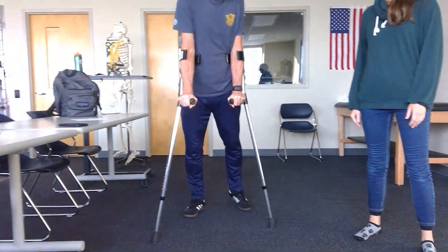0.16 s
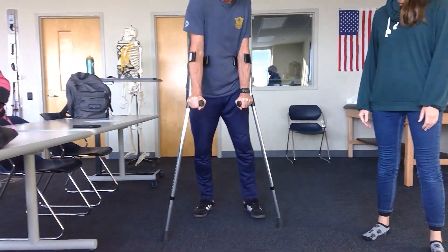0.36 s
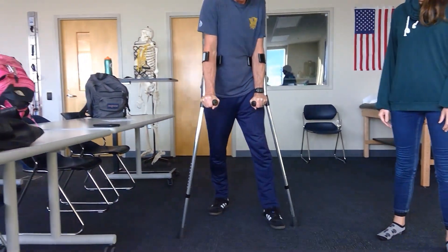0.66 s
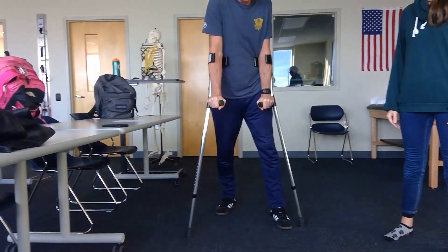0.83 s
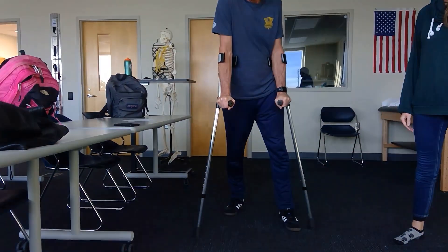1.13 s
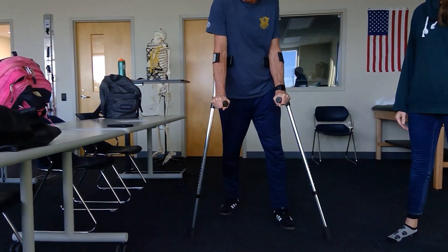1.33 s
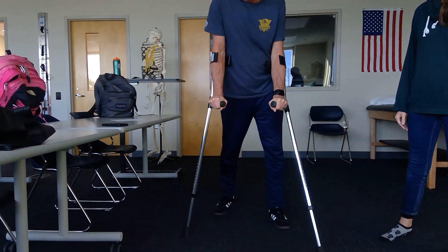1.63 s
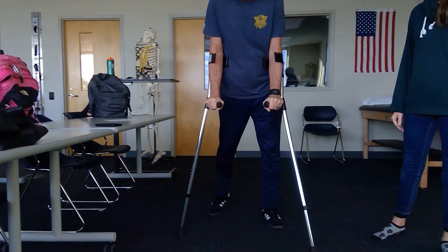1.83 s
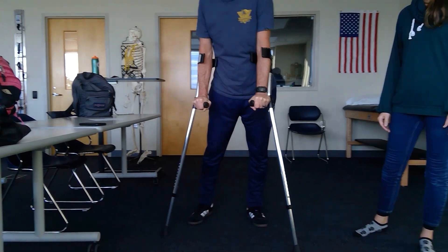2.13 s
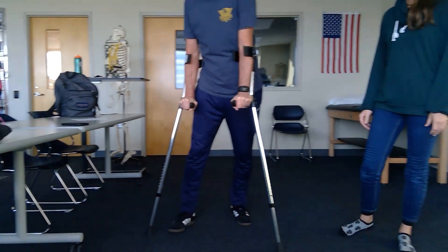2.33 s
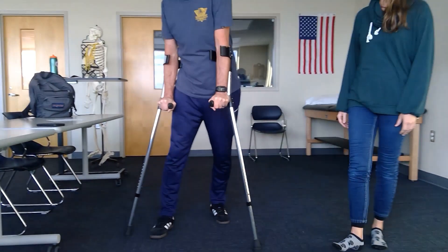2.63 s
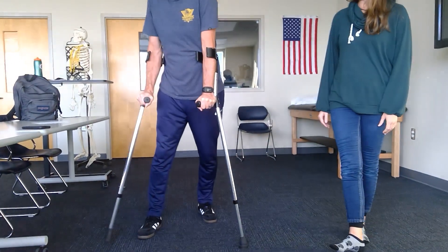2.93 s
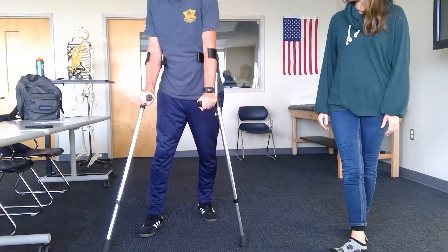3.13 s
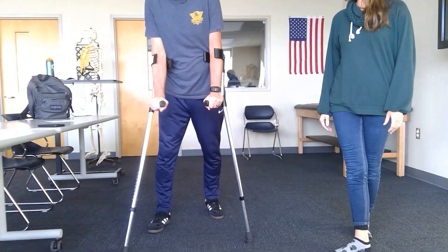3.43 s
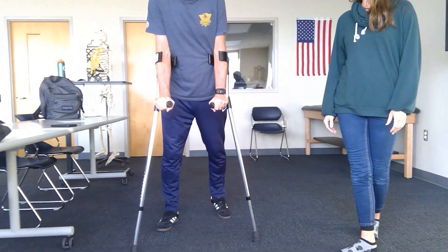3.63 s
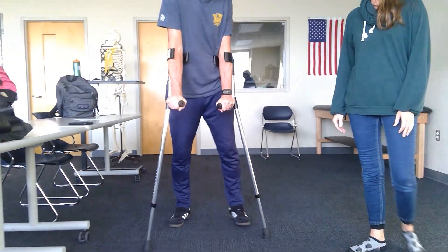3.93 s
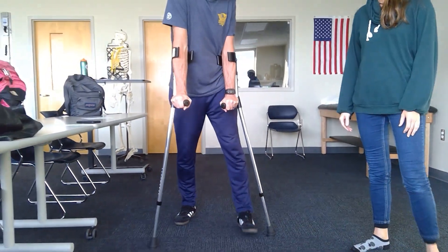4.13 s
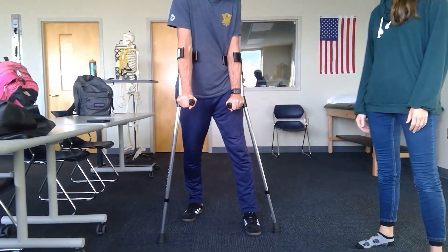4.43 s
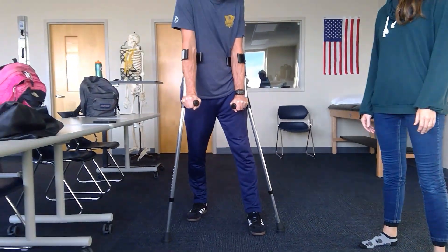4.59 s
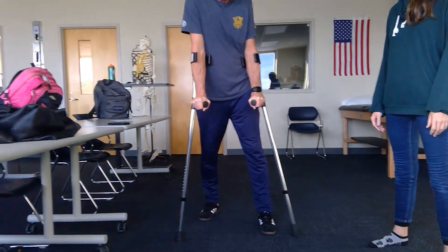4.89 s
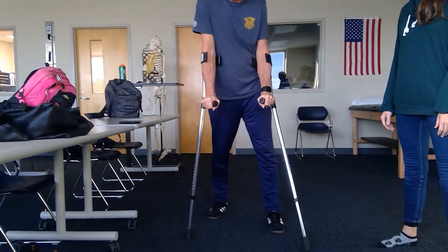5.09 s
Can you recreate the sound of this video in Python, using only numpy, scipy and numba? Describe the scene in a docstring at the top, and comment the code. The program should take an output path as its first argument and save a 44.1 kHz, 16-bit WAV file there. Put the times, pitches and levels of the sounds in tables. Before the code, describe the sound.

Aluminium crutches on carpet, heard from a few metres in stereo, leaning right, with short room reflections over steady air rumble and a very faint high whine. Quiet joint ticks, a faint rubber groan and dull foot pats lead to a muted knock; soles brush, sharp pin clicks precede one hard metallic clack, then a squeak, light scuffs and sparse ticks.

```python
"""Someone walks on two aluminium forearm crutches over carpet, a few metres from a stereo microphone in a small room.
Over ventilation rumble and a thin whine, a joint ticks, rubber groans faintly, a height pin clicks and a shoe pats.
A gentle tip plant knocks the tubes; soles brush the carpet and two more pin clicks lead to a second, hard plant.
A rising rubber squeak, more brushing and faint ticks follow. Shaped noise makes the contacts and carpet sounds,
decaying sines the ringing metal, gliding sines the rubber; decaying noise makes the room's reflections."""
import sys
import numpy as np
from scipy import signal
from scipy.fft import rfft, irfft, next_fast_len
from scipy.io import wavfile
from scipy.ndimage import uniform_filter1d
from numba import njit

SR = 44100
rng = np.random.default_rng(int(sys.argv[2]) if len(sys.argv) > 2 else 0)


def unload_wav(signal):
    """Save mono or channel-first audio to the path in sys.argv[1] as 16-bit WAV at rate SR, clipped to [-1, 1]."""
    wavfile.write(
        sys.argv[1],
        SR,
        np.round(np.clip(np.atleast_2d(signal).T, -1, 1) * 32767).astype(np.int16),
    )


N = 231611
TIME = np.arange(N) / SR
RING = TIME[:SR]  # one second, the span of every short sound


def undb(db):
    """Decibels to gain."""
    return 10 ** (np.asarray(db) / 20)


def level(x, db):
    """Set the rms level."""
    return x * undb(db) / np.sqrt(np.mean(x ** 2))


def burst(x, db=0):
    """Give a short sound the energy of 10 ms at this rms level."""
    return x * undb(db) * np.sqrt(SR / 100 / np.sum(x ** 2))


def lookup(hz, points):
    """Read (Hz, value) points on a log-frequency axis."""
    point_hz, value = np.transpose(points)
    return np.interp(np.log(np.maximum(hz, 1)), np.log(point_hz), value)


def colour(x, points, tilt_db=0):
    """Causal minimum-phase filter with a (Hz, dB) response, tilted per octave."""
    size = 2 * next_fast_len(len(x))
    hz = np.maximum(np.arange(size // 2 + 1) * SR / size, 10)
    response_db = lookup(hz, points) + tilt_db * np.log2(hz / hz.mean())
    cepstrum = irfft(np.log(undb(response_db)))
    # fold onto positive time
    cepstrum[1:size // 2] *= 2
    cepstrum[size // 2 + 1:] = 0
    return irfft(rfft(x, size) * np.exp(rfft(cepstrum)))[:len(x)]


def decay(t60_s):
    """An exponential fall of 60 dB in t60_s."""
    return np.exp(-np.log(1000) * RING / t60_s)


def delay(x, s):
    """The same sound s seconds later."""
    return np.concatenate([np.zeros(int(abs(s) * SR)), x])[:len(x)]


def add(track, start_s, x):
    """Mix a sound into a track."""
    start = int(start_s * SR)
    track[..., start:start + x.shape[-1]] += x[..., :N - start]


def wander(size):
    """Smooth random motion of rms 1 that changes over about this many samples."""
    smooth = uniform_filter1d(rng.standard_normal(N), size)
    return level(uniform_filter1d(smooth, size), 0)


def envelope(start_s, length_s, attack_s, release_s):
    """Gain of a sliding contact: it builds up, holds and falls 60 dB in release_s."""
    rise = np.sin(np.pi / 2 * np.clip((TIME - start_s) / attack_s, 0, 1)) ** 2
    past_end_s = np.maximum(TIME - start_s - length_s, 0)
    return rise * np.exp(-np.log(1000) * past_end_s / release_s)


def ring(modes):
    """Freely decaying modes of a struck part, each starting at a random phase."""
    total = 0
    for hz, db, t60_s in modes:
        total = total + undb(db) * decay(t60_s) * np.sin(2 * np.pi * (hz * RING + rng.random()))
    return burst(total)


def chatter(t60_s):
    """A dying run of tiny contacts, with its energy spread evenly over frequency."""
    x = rng.standard_normal(len(RING)) * decay(t60_s)
    even = irfft(np.exp(1j * np.angle(rfft(x))), len(x))
    return burst(even * decay(10 * t60_s))


def crack(points, t60_s, snap_db=-8):
    """One sharp contact and the chatter of loose parts after it."""
    snap = burst(1. * (RING == 0), snap_db)
    return burst(colour(chatter(t60_s) + snap, points))


def diffuse(size):
    """Noise arriving from all sides: alike at both ports in the bass, unrelated in the treble."""
    # correlation of the two ports in a diffuse field: freq_hz, correlation [-]
    likeness = [(30, 0.55), (70, 1), (130, 0.96), (290, 0.88), (640, 0.62), (1400, 0.084), (3000, 0.079),
                (16000, 0)]
    mid, side = rfft(rng.standard_normal((2, size)))
    alike = np.clip(lookup(np.arange(len(mid)) * SR / size, likeness), -1, 1)
    mid = mid * np.sqrt((1 + alike) / 2)
    side = side * np.sqrt((1 - alike) / 2)
    return irfft(np.array([mid + side, mid - side]), size)


def with_room(x, room_db):
    """A sound as two rows: what goes straight to the microphone, and what it sends into the room."""
    return np.array([x, x * undb(room_db)])


def background(air_db=-59, flutter_db=1, whine_hz=11804, whine_db=-85.5):
    """Ventilation noise whose rumble wavers and slowly eases, with smooth hiss and a steady electronic whine."""
    # ventilation spectrum: freq_hz, gain_db
    air_colour = [(10, 5), (20, 5), (35, -9.5), (50, -10.5), (66, -8.5), (100, -15.5), (125, -17.5),
                  (155, -25.5), (210, -20), (500, -32.5), (1000, -38), (2000, -41), (8000, -45),
                  (16000, -48)]
    rumble_db, ease_db_per_s = 3.5, 0.08
    air = level(np.array([colour(port, air_colour) for port in diffuse(N)]), air_db)
    rumble = signal.sosfilt(signal.butter(1, 1000, fs=SR, output="sos"), air)
    knots_s = np.linspace(0, TIME[-1], num=40)
    flutter = np.interp(TIME, knots_s, rng.standard_normal(len(knots_s)))
    swell_db = rumble_db - ease_db_per_s * TIME + flutter_db * flutter
    whine = level(np.sin(2 * np.pi * whine_hz * TIME), whine_db)
    return air + rumble * (undb(swell_db) - 1) + whine


def room(x, build_s=0.014, left_db=-2.5):
    """Diffuse reflections that build up quickly and mostly die sooner in the treble."""
    # reverberation time: freq_hz, t60_s
    room_t60 = [(60, 1.0), (250, .6), (600, 0.37), (1500, 0.25), (3500, 0.29), (8000, 0.27), (15000, 0.24)]
    hz, s, cells = signal.stft(diffuse(len(RING)), SR, nperseg=256)
    t60_s = lookup(hz, room_t60)[:, None]
    tail = signal.istft(cells * np.exp(-np.log(1000) * s / t60_s), SR)[1][:, :len(RING)]
    tail = tail * (1 - decay(build_s))
    tail = tail / np.sqrt(np.sum(tail ** 2) / 2) * undb([[left_db], [0]])
    return signal.fftconvolve(x[None], tail, axes=1)[:, :N]


def direct(x, echo_s=0.0089, echo_db=-10, left_lag_s=.00007):
    """The straight path and one bounce off a near surface; both reach the left port later and duller."""
    # left port, facing away from the walker: freq_hz, gain_db
    shadow = [(100, -3), (500, -9), (1300, -14.5), (3500, -21.5), (15000, -11.5)]
    x = x + undb(echo_db) * delay(x, echo_s)
    return np.array([delay(colour(x, shadow), left_lag_s), x])


def steps():
    """A shoe settles on the carpet: soft, dull noise pats that swell and decay."""
    # pats: start_s, level_db, t60_s, tilt_db_per_octave
    step_events = [(0.426, -53, 0.14, -6.5), (0.699, -56, 0.074, -1), (0.814, -65, 0.039, 3),
                   (1.114, -59.5, 0.15, -5), (1.901, -67, 0.17, 6)]
    # pat spectrum: freq_hz, gain_db
    step_colour = [(100, -2.5), (250, 0), (390, 4.5), (560, -2.5), (750, 1), (1100, -11.5), (1550, 1.5),
                   (2100, -13), (2800, -23), (8000, -40)]
    out = np.zeros(N)
    for start_s, db, t60_s, tilt_db in step_events:
        pat = rng.standard_normal(len(RING)) * (decay(t60_s) - decay(t60_s / 4))
        add(out, start_s, burst(colour(pat, step_colour, tilt_db), db))
    return with_room(out, -3.0)


@njit
def resonate(x, hz, width_hz):
    """State-variable band-pass whose centre moves every sample."""
    y, band, low = np.empty(len(x)), 0., 0.
    for i in range(len(x)):
        g = np.tan(np.pi * hz[i] / SR)
        k = width_hz / hz[i]
        v = (band + g * (x[i] - low)) / (1 + g * (g + k))
        band = 2 * v - band
        low = low + 2 * g * v
        y[i] = k * v
    return y


def scuffs(fibres_per_s=4500, width_hz=340.0, broad_db=-4, narrow_db=-2):
    """Carpet loops flick off the sole as it grips and slips; the gap under the shoe resonates at a gliding pitch."""
    # brushes: start_s, length_s, gain_db, resonance_hz, glide_octaves_per_s
    scuff_events = [(2.212, 0.13, -64.5, 1310, 1.5), (2.372, 0.14, -52, 1260, 2.2),
                    (3.694, 0.13, -67, 602, -0.5), (4.181, 0.077, -67.5, 2190, -3.5),
                    (4.245, 0.033, -59, 1750, -4)]
    # brush spectrum: freq_hz, gain_db
    scuff_colour = [(90, -26.5), (170, 0), (300, -9), (600, -9), (950, -13.5), (1200, -9), (1650, -12),
                    (2200, -15), (2800, -20.5), (4600, -16), (7000, -29.5), (14000, -40)]
    attack_s, release_s = 0.049, 0.14
    out = np.zeros(N)
    for start_s, length_s, db, hz, glide in scuff_events:
        grip = undb(2.5 * wander(size=220))
        flicks = rng.standard_normal(N) * (rng.random(N) < fibres_per_s / SR) * grip
        brush = colour(flicks, scuff_colour)
        centre_hz = hz * 2 ** (glide * np.clip(TIME - start_s, 0, length_s))
        hollow = resonate(brush, centre_hz, width_hz)
        scuff = level(brush, broad_db) + level(hollow, narrow_db)
        out += scuff * undb(db) * envelope(start_s, length_s, attack_s, release_s)
    return with_room(out, -7.5)


def slips(room_db=-7):
    """Stick and slip: rubber groans or squeaks with a stuttering, rising tone; its first hard grip relaxes."""
    # slips: start_s, length_s, tone_level_db, start_pitch_hz, glide_hz_per_s, attack_s, bite_db,
    # pitch_jitter [fraction], stutter_db
    slip_events = [(0.221, 0.28, -74.5, 524, 15, 0.034, 14, 0.031, -0.2),
                   (3.685, 0.053, -66, 520, 7700, 0.021, -0.5, 0.0426, 1),
                   (3.739, 0.075, -55, 1119, 11800, 0.0073, 17, 0.0305, 5)]
    bite_s, release_s = 0.013, 0.067  # bite_s: time constant of the grip in dB
    out = np.zeros(N)
    for start_s, length_s, db, hz, glide, attack_s, bite_db, jitter, stutter_db in slip_events:
        steady_hz = hz + glide * np.clip(TIME - start_s, 0, length_s)
        pitch_hz = steady_hz * (1 + jitter * wander(size=60))
        stutter = undb(stutter_db * wander(size=110))
        tone = level(np.sin(2 * np.pi * np.cumsum(pitch_hz) / SR) * stutter, db)
        bite = undb(bite_db * np.exp(-np.maximum(TIME - start_s - attack_s, 0) / bite_s))
        out += tone * bite * envelope(start_s, length_s, attack_s, release_s)
    return with_room(out, room_db)


def ticks(tick_rise_s=0.0023, tone_rise_s=0.0028):
    """A cuff or grip joint ticks softly, with one resonance and its octave ringing."""
    # ticks: start_s, tone_level_db, pitch_hz, t60_s, octave_db, dry_tick_db, room_db
    tick_events = [(0.1882, -52, 3433, 0.063, -37, -6, -6.5), (0.5996, -41, 3730, 0.01, -28, -16.5, -11.5),
                   (0.5996, -52, 1895, 0.0067, -21, -29, -0.5), (2.0875, -72.5, 3590, 0.055, -13, 3.5, -12),
                   (2.3880, -61, 4230, 0.14, -23, -8, -16), (4.0040, -56, 3400, 0.072, -7, -10, -13),
                   (4.0160, -64.5, 3710, 0.16, -15, -33.5, -3.5),
                   (4.8310, -61.5, 3610, 0.06, -19.5, -11, -15), (5.0290, -79, 3480, 0.09, -20, -1, -8)]
    # dry tick spectrum: freq_hz, gain_db
    tick_colour = [(600, -13), (1300, -7.5), (1950, -6), (2600, 2.5), (3500, 5.5), (5000, -6),
                   (7200, -15.5), (9000, -23), (16000, -33)]
    out = np.zeros((2, N))
    for start_s, db, hz, t60_s, octave_db, tick_db, room_db in tick_events:
        tone = ring([(hz, 0, t60_s), (2 * hz, octave_db, t60_s)]) * (1 - decay(tone_rise_s))
        dry_tick = crack(tick_colour, 0.086, snap_db=-9) * (1 - decay(tick_rise_s))
        add(out, start_s, with_room(undb(db) * (tone + undb(tick_db) * dry_tick), room_db))
    return out


def pins(settle_db=-13, fade_db=5):
    """The lower tube drops onto its spring pin, rebounds, rings high and settles in a few fainter contacts."""
    # pin snaps: start_s, click_level_db, rattle_t60_s, rebound_after_s, rebound_db, ring_db, room_db
    pin_events = [(0.425, -44, 0.023, .001, -1, -41, -9.5), (2.7999, -37.5, 0.0098, 0.0016, 6, -21.5, -5),
                  (3.0550, -29.5, 0.0041, .0014, -3.5, -17.5, -1.5)]
    # one click spectrum per snap: freq_hz, gain_db
    pin_colours = [
        [(1060, -66), (1800, -34), (2640, -37), (3290, -5), (3810, -5.5), (4020, -5), (5750, -2.5), (6240, -8),
         (6900, 1), (8060, -14), (10500, -14.5), (11100, -28), (12400, -7), (15100, -34), (16000, -44)],
        [(880, -57.5), (1500, -36), (2190, -21), (2560, -29), (3220, 0), (4200, -9), (4500, -6.5), (5710, -8),
         (7920, -2), (9560, -16), (10000, -12), (11200, -7.5), (12500, -19), (14600, -13), (16000, -34)],
        [(1200, -50.5), (2000, -24), (2800, -15.5), (3100, -22), (3400, -3.5), (3750, 1), (4500, -9.5),
         (5900, -11.5), (6700, 9), (7300, -5), (9000, -10.5), (12000, -15), (14500, -17), (16000, -18.5)],
    ]
    # unloaded lower tube: freq_hz, level_db, t60_s
    pin_modes = [(3690, -5, .2), (3740, 0, .28), (4113, -8, .14), (6690, -6, .2), (6780, -2, .3),
                 (6860, -5, .3), (7537, -13, .18)]
    out = np.zeros((2, N))
    for event, points in zip(pin_events, pin_colours):
        start_s, db, rattle_s, rebound_s, rebound_db, ring_db, room_db = event
        first = crack(points, rattle_s)
        rebound = undb(rebound_db) * delay(crack(points, rattle_s), rebound_s)
        click = burst(first + rebound)
        for k, lag_s in enumerate(np.cumsum(rng.uniform(.007, 0.022, size=3))):
            click = click + undb(settle_db - k * fade_db) * delay(crack(points, rattle_s), lag_s)
        tube = undb(ring_db) * ring(pin_modes)
        add(out, start_s, with_room(undb(db) * (click + tube), room_db))
    return out


def plants(cushion_s=0.0013, collar_db=0):
    """The rubber tip gives briefly, the tubes slam together and ring; the weight shakes the floor a moment later."""
    # tip plants: start_s, level_db, rattle_t60_s, tube_ring_db, floor_shake_db, room_db
    plant_events = [(1.6787, -42.5, 0.074, -14.5, -7.5, -5.5), (3.3769, -21, .016, -5, -16.5, 0)]
    # one knock spectrum per plant, gentle then hard: freq_hz, gain_db
    plant_colours = [
        [(120, -6), (230, -1), (380, -11), (560, -0.5), (720, -9), (920, 1), (1120, -9), (1500, 1.5),
         (2200, -20.5), (2950, -6), (5300, -20.5), (7400, -6), (9500, -24), (16000, -34)],
        [(50, -3.5), (120, -6.5), (240, -4.5), (340, -0.5), (580, 3), (800, 3.5), (1500, 0), (2700, 3.5),
         (4500, -3.5), (5500, -3.5), (6900, 2), (9500, -8), (15500, -10)],
    ]
    # loaded tubes: freq_hz, level_db, t60_s
    tube_modes = [(327, -13, 0.36), (817, 7, 0.096), (1030, -1, 0.14), (1243, 4, 0.046), (1330, 3, 0.06),
                  (1790, 1, 0.11), (1887, -3.5, 0.21), (1913, -2, 0.51), (2020, 8, 0.095),
                  (2410, -0.5, 0.048), (2622, 5.5, 0.15), (2762, -4, 0.13), (2992, -8.5, .14),
                  (3570, -7, 0.29), (6420, -3.5, 0.13), (6830, -7.5, 0.24), (7680, -7.5, 0.2)]
    # collar between the tubes, a brief clack: freq_hz, level_db, t60_s
    collar_modes = [(1300, 2, 0.02), (2630, -3, 0.03)]
    floor_colour = [(20, 3.5), (45, -6), (68, -4.0), (110, -13.5), (300, -31.0), (1000, -66.5)]  # (Hz, dB)
    out = np.zeros((2, N))
    for (start_s, db, rattle_s, ring_db, shake_db, room_db), points in zip(plant_events, plant_colours):
        cushion = 1 - decay(cushion_s)
        knock = (crack(points, rattle_s, snap_db=-23.0) + undb(ring_db) * ring(tube_modes)) * cushion
        shake = rng.standard_normal(len(RING)) * (decay(0.5) - decay(.12))
        shake = burst(colour(shake, floor_colour), shake_db)
        add(out, start_s, with_room(undb(db) * (knock + shake), room_db))
        # the collar faces the microphone and has its own room level
        clack = undb(db + ring_db + collar_db) * ring(collar_modes) * cushion
        add(out, start_s, with_room(clack, -6))
    return out


def scene():
    """All sources, heard straight and through the room, over the background."""
    straight, sent = steps() + scuffs() + slips() + ticks() + pins() + plants()
    return background() + room(sent) + direct(straight)


def record(dry, top_hz=16200):
    """The recorder cuts the top with a steep elliptic low-pass."""
    return signal.sosfilt(signal.ellip(8, .2, 70, top_hz, fs=SR, output="sos"), dry)


dry = scene()
out = record(dry)
unload_wav(out)
```